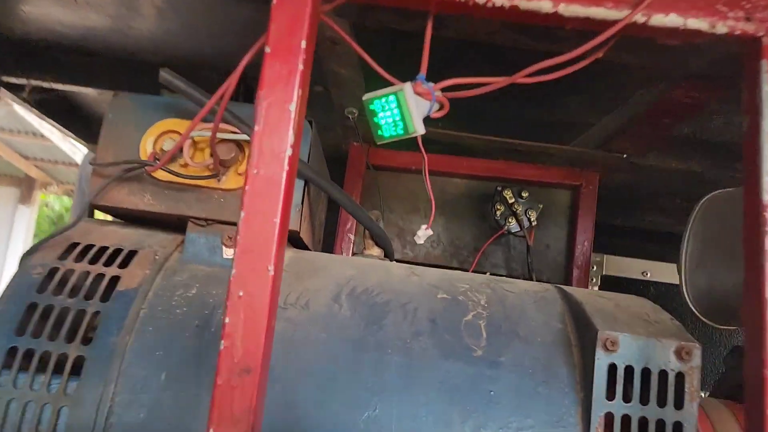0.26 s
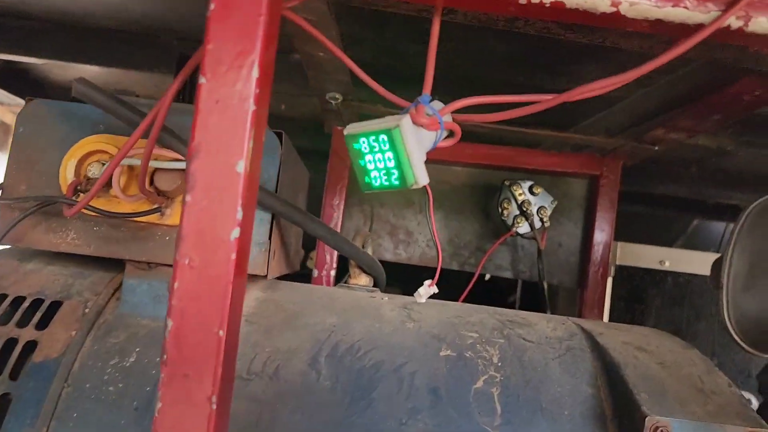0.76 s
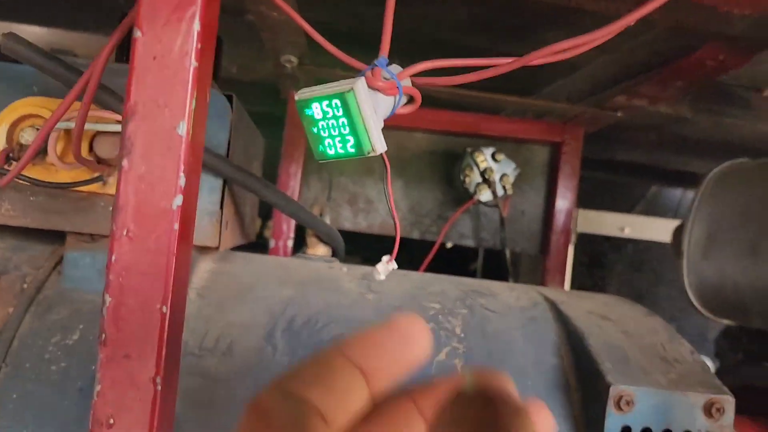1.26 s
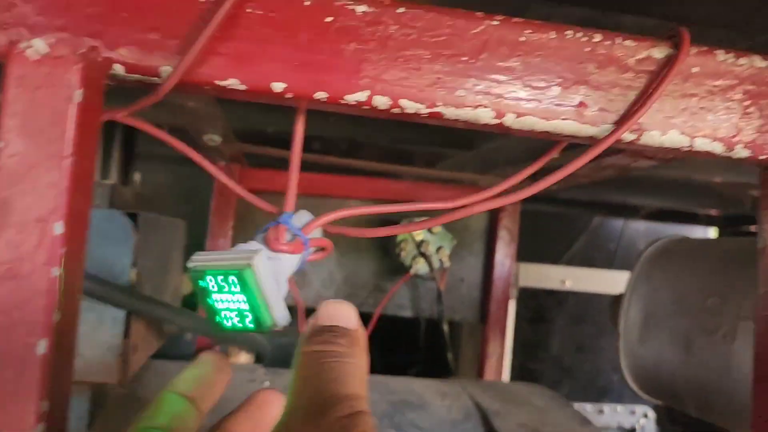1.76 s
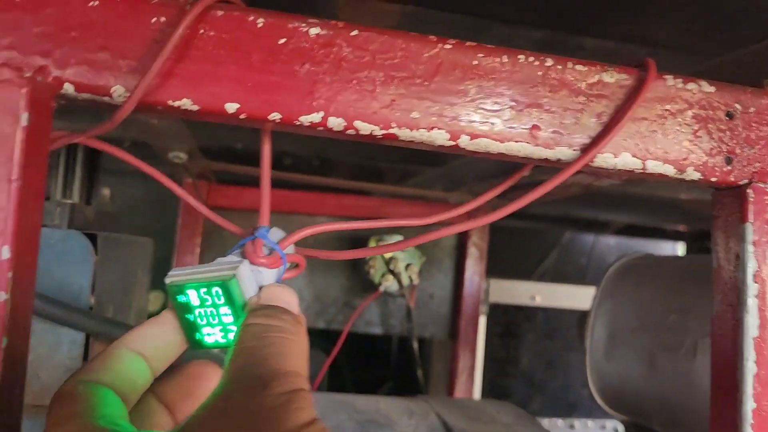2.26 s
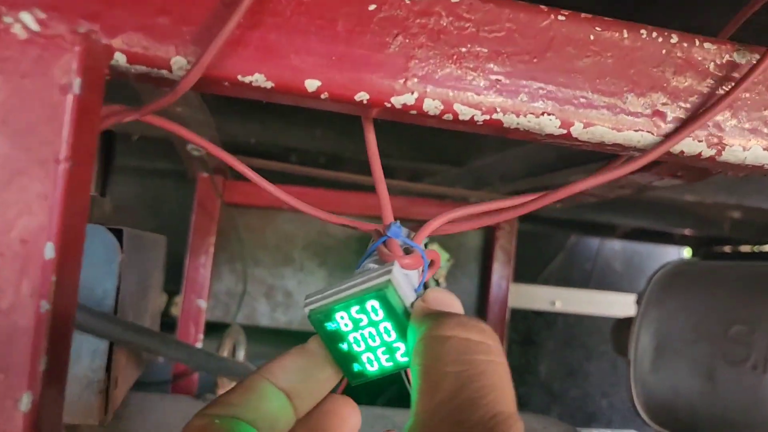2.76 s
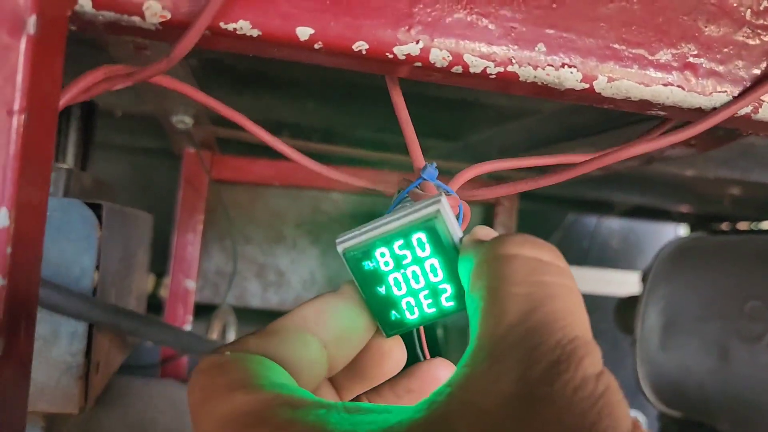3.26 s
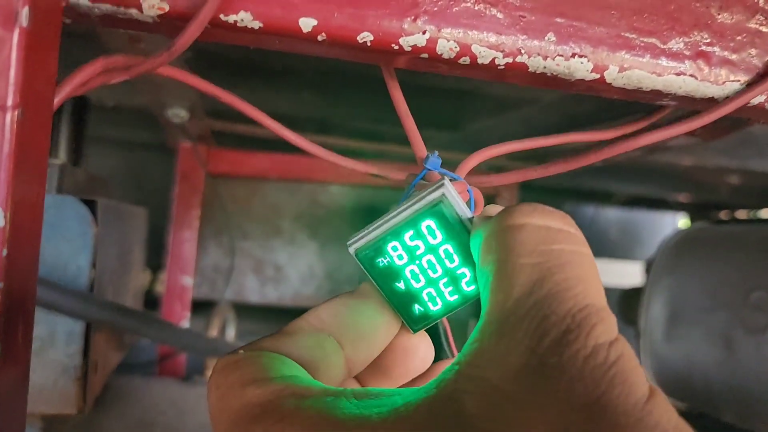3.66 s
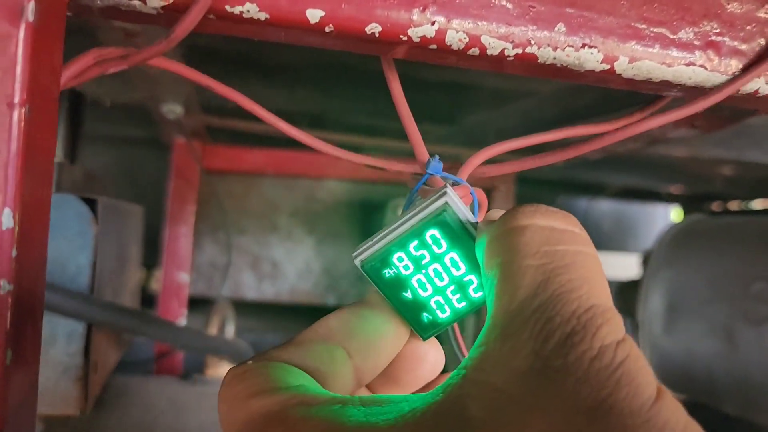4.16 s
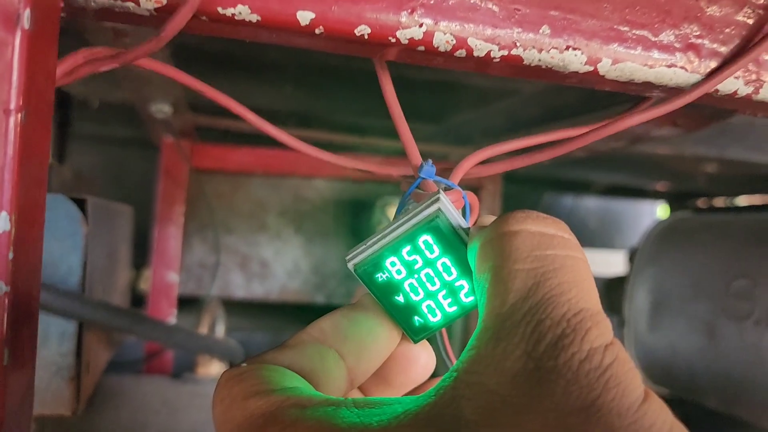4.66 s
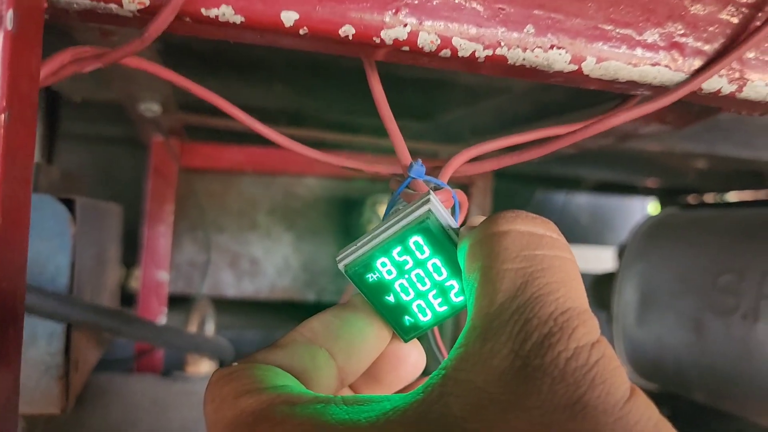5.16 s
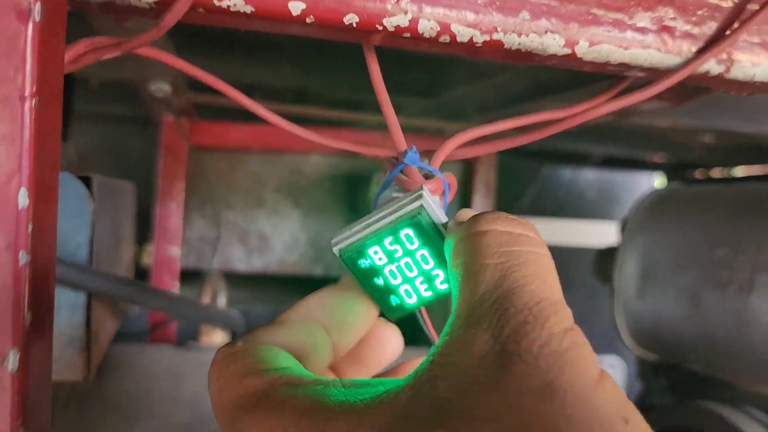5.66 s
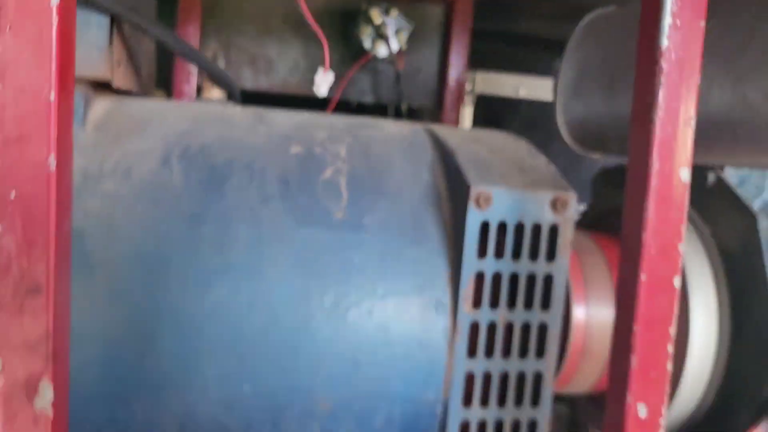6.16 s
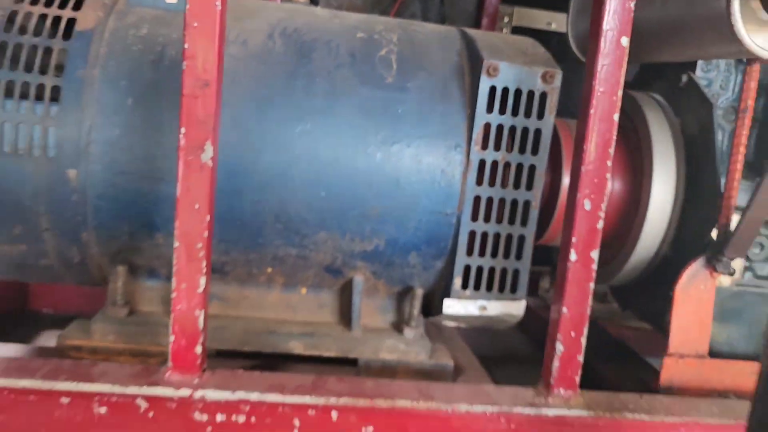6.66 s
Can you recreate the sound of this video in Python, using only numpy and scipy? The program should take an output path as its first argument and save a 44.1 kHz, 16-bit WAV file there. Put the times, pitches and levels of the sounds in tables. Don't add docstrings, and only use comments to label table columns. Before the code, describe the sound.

From 0 to about 6.9 seconds a small two-cylinder diesel generator runs without pause at near-constant speed, wavering only minutely. Around fifteen times a second two close puffs boom deep in the exhaust and intake pipes, then a gap, making a rapid uneven throb. Each cycle brings rough gas roar, block rattle, ringing metal panels and bright valve ticks, over steady fan hiss and a faint electrical hum. Harder metallic knocks jump out irregularly, clustered from 0.3 to 3.2 seconds and again from 5.8 onward. Around 1.7 the rattle dulls briefly. From 2.3 to 5.7 the phone is deep inside the frame: roar and some panel ringing soften, hum and other rings come forward. Near 6.1 a faint hollow airy tone passes, then the whole engine drops slightly as the phone backs away, still running at the end. Close, outdoor, wide stereo.

```python
import sys
import numpy as np
from scipy import signal
from scipy.fft import rfft, irfft, next_fast_len
from scipy.io import wavfile
from scipy.ndimage import uniform_filter1d, map_coordinates

SR = 44100
rng = np.random.default_rng(int(sys.argv[2]) if len(sys.argv) > 2 else 0)


def store_pcm(level_fs):
    pcm = np.round(np.clip(level_fs, -1, 1) * 32767).astype(np.int16)
    wavfile.write(sys.argv[1], SR, np.atleast_2d(pcm).T)


def magnitude_from_level(level_db):
    exponent = np.asarray(level_db, float) / 20
    return 10 ** exponent


N = 304068
EARLY = SR // 4


def unit(x):
    return x / np.sqrt(np.mean(x ** 2) + 1e-20)


def along(points, hz):
    f, v = np.transpose(points)
    return np.interp(np.log(hz + 1), np.log(f + 1), v)


def filtered(x, response):
    m = next_fast_len(x.shape[-1] + SR // 2)
    spectrum = rfft(x, m) * response(np.fft.rfftfreq(m, 1 / SR))
    return irfft(spectrum, m)[..., :x.shape[-1]]


def resonance(f, hz, width_hz):
    damping = 1j * f * width_hz
    return damping / (hz * hz - f * f + damping)


def bell(middle_s, half_s):
    return np.exp(-((np.arange(N) / SR - middle_s) / half_s) ** 2)


def waver():
    return map_coordinates(rng.standard_normal(30), [np.arange(N) * 3 / SR])


# (time [s], nearness [dB], depth inside [0-1])
PHONE_PATH = [(0, -.5, 0.04), (.3, 0.05, 0.01), (.9, -0.15, 0.42), (1.6, 0, 0.42), (2.3, 0, 0.88),
              (3.0, -0.5, 0.72), (3.9, 0, 0.86), (4.6, -0.1, 0.82), (5.7, 0, 0.76), (6.1, -1.1, 0.38),
              (6.5, -1.34, 0.13), (6.9, -2.7, 0)]


def phone():
    s, near_db, inside = np.transpose(PHONE_PATH)
    t = np.arange(N) / SR
    return np.interp(t, s, near_db), np.interp(t, s, inside)


def heard(outside_db, change_db):
    near_db, inside = phone()
    return near_db + outside_db + change_db * inside


# (time [s], lead over steady speed [cycles])
CRANK_LEAD = [(0, .1834), (.35, .1831), (.72, .1752), (.95, .1809), (1.7, .1827), (1.98, .171),
              (2.17, .1711), (2.98, .1985), (3.35, .1978), (3.75, .2072), (3.95, .1977), (4.52, .166),
              (4.75, .1681), (5.3, .1945), (6.0, .215), (6.55, .2239), (6.9, .226)]


def crank():
    cycle_hz = 14.54
    t = np.arange(-EARLY, N) / SR
    return np.interp(t, *np.transpose(CRANK_LEAD)) + cycle_hz * t


def beats(share, scatter_db, jitter_s):
    turned = crank()
    cycles = np.arange(np.ceil(turned[0]), turned[-1])
    at = np.interp(cycles + share, turned, np.arange(len(turned)), right=-SR)
    luck = rng.standard_normal((len(at), 2))
    at = at + jitter_s * SR * luck[:, 0]
    size = magnitude_from_level(scatter_db * luck[:, 1]) * (at >= 0)
    return np.bincount(np.clip(at, 0, len(turned) - 1).astype(int), size, len(turned))


def shaking(events, scatter_db, sooner=0):
    t = np.arange(SR // 8) / SR
    power = 0
    for share, db, t60_s in events:
        decay = magnitude_from_level(2 * (db - 60 * t / t60_s)) * (1 - np.exp(-t / .002))
        power = power + signal.fftconvolve(beats(share - sooner, scatter_db, jitter_s=.0008), decay)
    return unit(np.sqrt(np.abs(power[EARLY:][:N])))


# (cycle share [0-1], level [dB], t60 [s])
CYCLE_KNOCKS = [
    (.025, 2.5, 0.052),
    (.185, 5, 0.032),
    (.29, 0.5, 0.066),
    (.44, -4.5, 0.063),
    (.78, -9.5, 0.065),
    (.85, -11.5, 0.019),
]


def knock_shaking(scatter_db, sooner=0):
    return shaking(CYCLE_KNOCKS, scatter_db, sooner)


# (frequency [Hz], left minus right [dB])
PORT_BALANCE = [(60, 5), (200, -7), (500, 0.5), (800, 4.5), (1200, -4), (1800, -8.5), (2700, -3),
                (3600, -9.5), (4300, -7), (7500, -9.5), (8200, -11.5), (9000, 10), (10800, -10),
                (11600, -7.5), (15000, -5.5)]


def sided(hz):
    return magnitude_from_level(along(PORT_BALANCE, hz) / 2 * np.array([[1], [-1]]))


# (frequency [Hz], left-right likeness [-1 to 1])
PORT_LIKENESS = [(60, 0.15), (120, 0.3), (240, 0.31), (480, 0.45), (950, 0.23), (1890, -0.12), (3770, 0.19),
                 (7520, 0.049), (15000, 0.01)]


def rush(spectrum, patchy_db):
    z = signal.stft(rng.standard_normal((2, N)), nperseg=512)[2]
    field = uniform_filter1d(rng.standard_normal(z.shape[1:]), 5, 0)
    field = uniform_filter1d(field, 8, 1)
    pair = signal.istft(z * magnitude_from_level(patchy_db * unit(field)), nperseg=512)[1][:, :N]

    def mid_side(hz):
        turn = np.arccos(np.clip(along(PORT_LIKENESS, hz), -1, 1)) / 2
        return magnitude_from_level(along(spectrum, hz)) * [np.cos(turn), np.sin(turn)]

    mid, side = filtered(pair, mid_side)
    return unit(filtered(np.array([mid + side, mid - side]), sided))


# (frequency [Hz], density [dB per Hz])
FAN_SPECTRUM = [(590, -31), (1000, -0.5), (1200, -5.5), (1860, -1), (2370, -2), (2660, -7.5), (3510, -6),
                (4570, -4.5), (5130, -1), (6840, -2.5), (7410, 1.5), (9770, -16.5), (11900, -7),
                (13600, -7.5), (15700, -13)]


def fans():
    return magnitude_from_level(heard(-17.5, -0.1) - 14.0) * rush(FAN_SPECTRUM, patchy_db=1.0)


# (order [per cycle], level [dB])
HUM_ORDERS = [(2, -55), (33, -45), (39, -55), (49, -46), (63, -54)]


def hum():
    turned = crank()[EARLY:]
    tones = 0
    for order, db in HUM_ORDERS:
        level = magnitude_from_level(db + .7 * waver())
        tones = tones + level * np.sin(2 * np.pi * order * turned + 0.45 * waver())
    return np.sqrt(2) * magnitude_from_level(heard(-10, 10)) * tones


def gap():
    hz, width_hz = 950, 130
    air = filtered(rng.standard_normal(N), lambda f: resonance(f, hz, width_hz) ** 2)
    return magnitude_from_level(-41) * bell(middle_s=6.1, half_s=0.2) * unit(air)


# (frequency [Hz], density [dB per Hz])
ROAR_SPECTRUM = [(20, -42), (45, -8), (90, 0.5), (125, 5.5), (190, -4), (280, -5), (400, -11), (530, -12.5),
                 (700, -9.5), (800, -17.5), (1000, -10.5), (1130, -19), (1400, -23), (2000, -80)]


def roar():
    swell = unit(3.0 + knock_shaking(scatter_db=-0.5))
    return magnitude_from_level(heard(-31, -5.5) + 4.5) * rush(ROAR_SPECTRUM, patchy_db=1.0) * swell


def plate(x):
    extra_ms = 1.97 + 2.57 * phone()[1]
    late = np.arange(N) - extra_ms * SR / 1000
    echo = [map_coordinates(side, [late], order=1, mode="nearest") for side in x]
    return x + 0.2 * np.array(echo)


# (cycle share [0-1], level [dB], t60 [s])
VALVE_TICKS = [
    (.04, 7.5, 0.065),
    (.28, 2, 0.045),
    (.42, 8, 0.066),
    (.78, -26, 0.029),
    (.84, 5, 0.12),
]
# (frequency [Hz], density [dB per Hz])
TICK_SPECTRUM = [(4000, -50), (6500, 0), (7500, -19), (8400, 4), (8800, -4.5), (11000, -14), (11500, 0.5),
                 (13500, -3), (15700, -15)]


def valve_gear():
    clatter = shaking(VALVE_TICKS, scatter_db=5)
    return magnitude_from_level(heard(-17.5, -0.1) - 22.5) * clatter * rush(TICK_SPECTRUM, patchy_db=0.5)


# (frequency [Hz], density [dB per Hz])
RATTLE_SPECTRUM = [(590, -21), (1000, -3), (1230, 0), (1880, -2.5), (2400, 6.5), (2980, 0.5), (3510, 3),
                   (4570, -3), (5130, -8), (7410, -5), (9770, -14), (11900, -11), (15700, -30)]


def block():
    shade_db = -3.5 * bell(middle_s=1.7, half_s=0.2)
    level = magnitude_from_level(heard(-36, -2.5) + shade_db + 3)
    return level * knock_shaking(scatter_db=2) * rush(RATTLE_SPECTRUM, patchy_db=4)


# (frequency [Hz], width [Hz], left [dB], right [dB])
PANEL_MODES = [(1526, 80, -8, -11), (1893, 81, -11, -6.5), (2640, 100, 1, 3.5), (2890, 110, -6, -0.5),
               (3110, 68, -2.5, -0.6), (3264, 80, -3, -9), (4090, 50, -8, -1.5), (4457, 110, -12, 5),
               (4670, 140, -25, -7), (4760, 170, -10, 3.5), (5180, 55, -15, -4), (5550, 83, -9, -1.5),
               (5820, 72, -10, -3.5), (6315, 130, -19, -2), (7310, 230, -6.5, -1), (7610, 92, -14, -1)]


def panels():
    low_db, high_db = heard(-35.5, -6) + 2.0, heard(-35, -1.37)
    inside = phone()[1]
    out = np.zeros((2, N))
    for k, (hz, width_hz, left_db, right_db) in enumerate(PANEL_MODES):
        shared, own = rng.standard_normal((2, N))
        other = 0.87 * np.roll(shared, rng.integers(-30, 30)) + 0.59 * own
        push = knock_shaking(scatter_db=4.5, sooner=0.024) * np.array([shared, other])
        ring = filtered(push, lambda f: resonance(f, hz, width_hz) * resonance(f, hz, 4 * width_hz))
        facing_db = -4.5 + 8.5 * inside if k in (1, 5) else 0
        drift_db = 1.25 * waver()
        level = magnitude_from_level((low_db if k < 6 else high_db) - 3.0 + facing_db + drift_db)
        out += level * magnitude_from_level([[left_db], [right_db]]) * unit(ring)
    return out


# (time [s], peak [dB], ring [Hz])
HARD_KNOCKS = [(0.335, -20.5, 2910), (0.747, -20.5, 3120), (1.022, -25, 2960), (1.2973, -21.5, 2640),
               (1.375, -19, 2910), (1.504, -17.5, 2620), (1.574, -23, 2640), (1.641, -25, 2650),
               (1.778, -24, 2940), (1.917, -24, 2860), (2.054, -20, 4760), (2.124, -28, 4600),
               (2.193, -24, 4750), (2.272, -18, 4760), (2.6035, -24, 2680), (2.947, -23, 3250),
               (3.0843, -31, 3170), (3.1523, -24, 3230), (5.834, -21.5, 2910), (5.9717, -25, 2940),
               (6.1105, -21, 3110), (6.1847, -18, 2930), (6.317, -32, 2940), (6.385, -23, 4700),
               (6.866, -21, 4220)]


def hard_knocks():
    out, t = np.zeros((2, N + SR)), np.arange(SR // 10) / SR
    t60_s, rise_s = 0.094, 0.0014
    for s, db, hz in HARD_KNOCKS:
        rough = np.cumsum(rng.normal(0, 0.1, (2, len(t))), axis=1)
        envelope = magnitude_from_level(db - 0.5 - 60 * t / t60_s) * (1 - np.exp(-t / rise_s))
        out[:, round(s * SR):][:, :len(t)] += envelope * np.sin(2 * np.pi * hz * t + rough)
    return magnitude_from_level([[-2.5], [2.5]]) * out[:, :N]


def puff(share):
    return beats(share, scatter_db=.35, jitter_s=.00005)


def ring_modes(x, rows):
    return filtered(x, lambda f: sum(sign * magnitude_from_level(db) * resonance(f, hz, w) for hz, w, db, sign in rows))


# (frequency [Hz], width [Hz], level [dB], polarity [+-1])
EXHAUST_MODES = [(142.1, 73.5, -27.4, 1), (155.5, 39.5, -24.6, -1), (206.6, 12.7, -21.4, -1),
                 (207.5, 9.0, -19.5, 1), (236.9, 57.1, -48.0, -1), (265.4, 15.7, -39.3, -1),
                 (347.1, 18.1, -47.0, -1)]
# (frequency [Hz], width [Hz], level [dB], polarity [+-1])
INTAKE_MODES = [(71.0, 18.7, -33.8, 1), (79.7, 9.0, -33.9, -1), (102.4, 10.1, -31.2, -1),
                (125.8, 12.2, -26.7, 1), (162.2, 10.3, -28.4, -1), (302.2, 18.3, -42.4, 1),
                (322.2, 10.1, -41.5, -1)]
# (frequency [Hz], width [Hz], level [dB], signed weight)
SHELL_MODES = [(452, 30, -56.5, 0.32), (626, 50, -57.5, -0.42), (702, 77, -65.5, 0.84),
               (821, 26, -62, -0.83), (906, 18.3, -57, 0.93), (1027, 31, -59, -0.62)]
# (cycle share [0-1], level [dB])
SHELL_SLAPS = [
    (.09, -2),
    (0.281, 4),
    (0.548, 0),
    (0.621, -5),
]


def pipes():
    exhaust = ring_modes(puff(-.0058) + 1.107 * puff(.2442), EXHAUST_MODES)
    intake = ring_modes(puff(-.1353) + .59 * puff(.1147), INTAKE_MODES)
    slaps = sum(magnitude_from_level(db) * beats(share, scatter_db=2.5, jitter_s=.0001) for share, db in SHELL_SLAPS)
    shell = ring_modes(slaps, SHELL_MODES)

    def ports(hz):
        soft = 1 / (1 + (hz / 1100) ** 6)
        lag = np.exp(-1j * np.pi * hz * .00014 * np.array([[1], [-1]]))
        return soft * magnitude_from_level([[-.2], [.2]]) * lag

    boom = filtered(unit(exhaust + intake + shell), ports)[:, EARLY:]
    return magnitude_from_level(heard(-17.5, -0.1) + 0.75) * boom


def scene():
    background = fans() + hum() + gap() + plate(roar())
    knocking = valve_gear() + block() + panels() + hard_knocks()
    return background + knocking + pipes()


def band_limit(x):
    return signal.sosfilt(signal.butter(12, 15810, fs=SR, output="sos"), x)


# (frequency [Hz], width [Hz], depth [0-1])
BODY_DIPS = [(2350, 200, .35), (3500, 250, .5), (5050, 200, .4), (8750, 400, .4)]


def record(dry):
    def body(hz):
        gain = (hz < 15810) / (1 + (20 / (hz + 1)) ** 8)
        for centre_hz, width_hz, depth in BODY_DIPS:
            gain = gain * (1 - depth * np.abs(resonance(hz, centre_hz, width_hz)) ** 2)
        return gain

    return band_limit(filtered(dry, body))


dry = scene()
out = record(dry)
store_pcm(out)
```